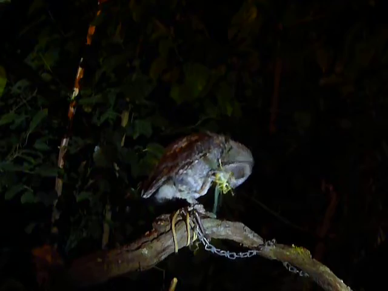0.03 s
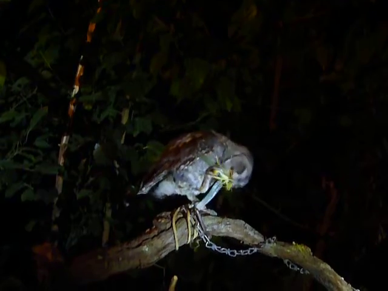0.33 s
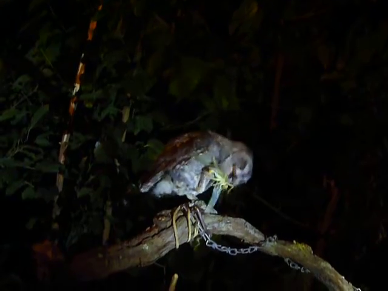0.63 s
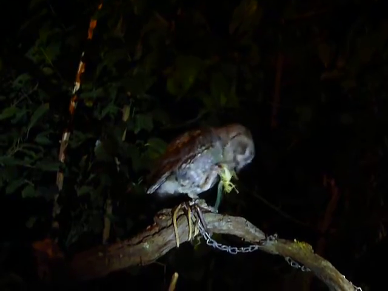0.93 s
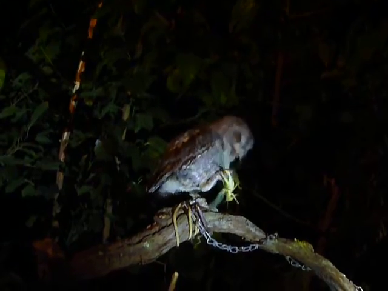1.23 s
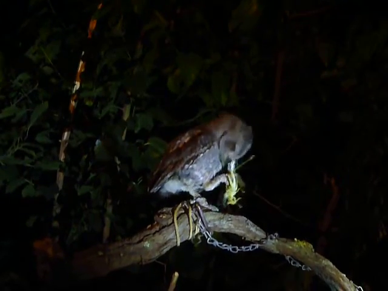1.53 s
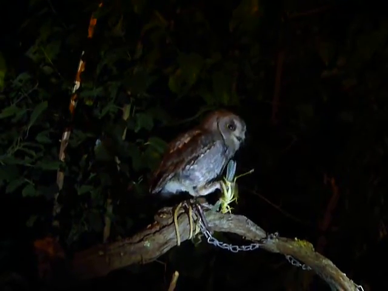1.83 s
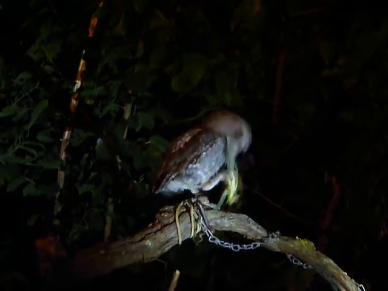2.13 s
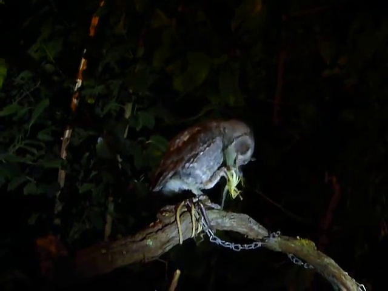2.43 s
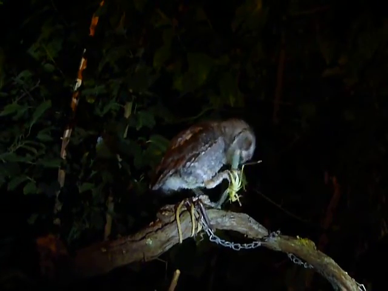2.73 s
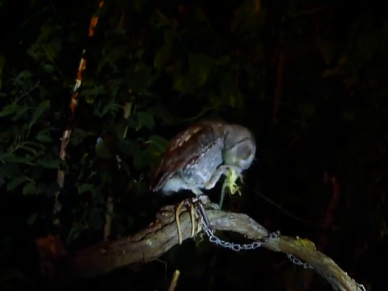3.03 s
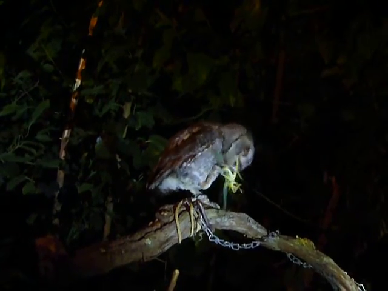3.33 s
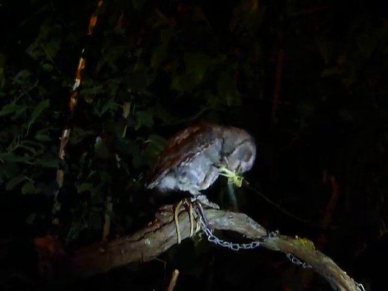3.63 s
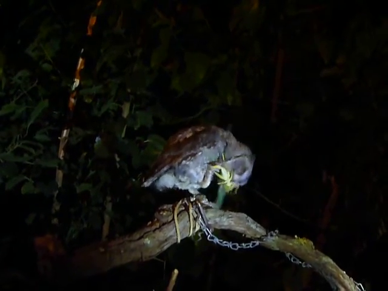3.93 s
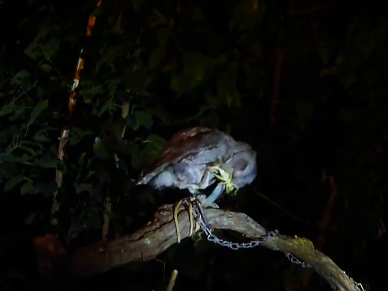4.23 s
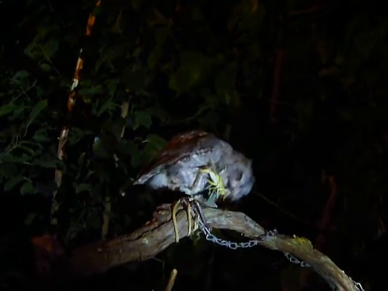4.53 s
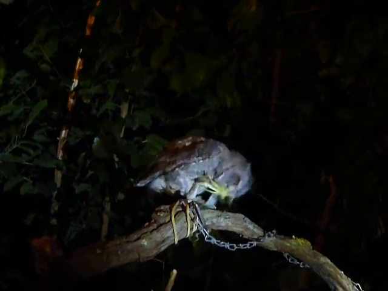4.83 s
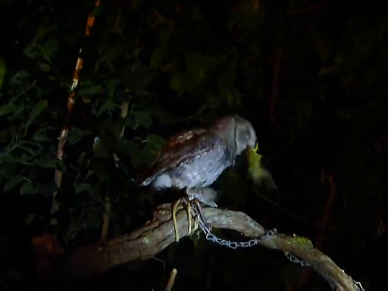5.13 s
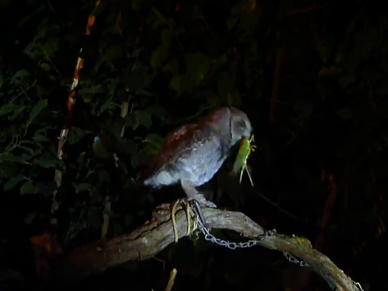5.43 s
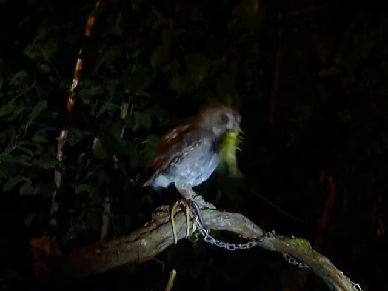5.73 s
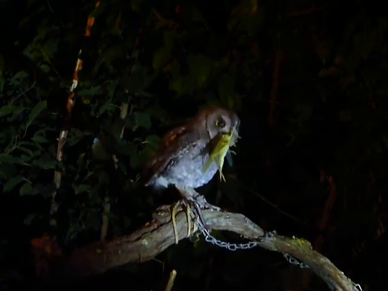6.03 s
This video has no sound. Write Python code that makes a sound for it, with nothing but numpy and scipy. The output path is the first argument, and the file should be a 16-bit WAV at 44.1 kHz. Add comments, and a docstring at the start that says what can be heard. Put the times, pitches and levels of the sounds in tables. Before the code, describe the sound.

At night by the edge of a wood, crickets make a faint, continuous chorus: one trills, another chirps about three times a second. A katydid gives a dry double scrape every second or two, and tiny high ticks come from the leaves. From about a second in, soft low bumps reach the microphone, singly and in flurries, standing above the insects. A distant rumble and light hiss run underneath.

```python
"""A cricket trills at night at the edge of a wood, rubbing its wings, while other crickets chirp.
A katydid (a bush cricket) scrapes its wings every second or two, and thin ticks come from the leaves.
Soft low bumps reach the microphone, singly and in flurries. One dry snip may be a tethered owl feeding
on a branch. Leaves smear the insects' calls; behind them lie a far hollow note, a rumble and a hiss."""
import sys
import numpy as np
from scipy import signal
from scipy.fft import rfft, irfft
from scipy.io import wavfile
from scipy.ndimage import uniform_filter1d

SR = 44100
rng = np.random.default_rng(int(sys.argv[2]) if len(sys.argv) > 2 else 0)


def file_out(sig):
    """Save sig as 16-bit WAV at sys.argv[1]."""
    # one column per channel
    cols = np.atleast_2d(sig).T
    # limit, then scale
    lim = np.clip(cols, -1, 1)
    pcm = np.round(lim * 32767).astype(np.int16)
    wavfile.write(sys.argv[1], SR, pcm)


N = 273420
T = np.arange(N) / SR


def trilling_cricket(hz=3590, drift_hz=8, others_db=-9, gain_db=-1.6):
    """A cricket rubs its wings in a fast, unbroken trill, with more of its kind blended behind it."""
    # how loud the trill is over time: t/s, level/dB
    loudness = [(0.0, -60), (0.08, -61), (3.54, -58.5), (3.59, -57), (4.97, -57), (5.27, -64), (6.2, -64.5)]
    times, db = np.transpose(loudness)
    song = wing_strokes(49.2, hz + drift_hz * drift(2), duty=.77, fall_hz=159.9, wander=.005)
    blend = unit(foliage(song, fade_s=.23, echo_db=-3.5)) + undb(others_db) * noise_band(3632, 120)
    return unit(blend) * undb(np.interp(T, times, db) + gain_db)


def wing_strokes(per_second, hz, duty, fall_hz, wander):
    """Each stroke is a short tone that sinks as the wing slows; it sounds for the share `duty` of a beat."""
    cycle = (np.cumsum(per_second * (1 + wander * drift(5))) / SR + rng.random()) % 1
    progress = np.minimum(cycle / duty, 1)
    pitch = hz - fall_hz * (progress - .5) + 18 * drift(40)
    strength = np.sin(np.pi * progress) * undb(1.1 * drift(35))
    return unit(strength * tone(pitch))


def near_cricket(stroke_s=.027, gap_s=.0322, hz=4800, fall_hz=560, first_db=-5, count=4):
    """Four wing strokes make a chirp, the first one soft; each holds its pitch and then droops."""
    # chirps, timed at their last stroke: t/s, level/dB
    chirps = [(.148, -62), (.385, -62), (.692, -57), (.982, -63), (1.266, -58.5), (1.547, -57),
              (1.925, -54), (2.342, -52), (2.683, -54.5), (3.066, -56), (3.408, -56.5), (3.719, -61),
              (4.002, -59.5), (4.566, -58), (4.855, -55.5), (5.242, -58), (5.522, -56), (5.79, -56.5),
              (6.139, -60)]
    out = np.zeros(N)
    progress = np.linspace(0, 1, int(stroke_s * SR))
    for s, db in chirps:
        for k, (size, detune) in enumerate(rng.standard_normal((count, 2))):
            pitch = hz + 15 * detune - fall_hz * progress ** 3
            stroke = np.sin(np.pi * progress) ** 2 * tone(pitch)
            i = int((s - k * gap_s - stroke_s / 2) * SR)  # k counts back from the last stroke
            out[i:i + len(stroke)] += stroke * undb(db + size + first_db * (k == count - 1))
    return foliage(out, fade_s=.2, echo_db=-12)


def katydid(tooth_hz=330, grain=.42, attack_s=.005, release_s=.018, sag=.35, ring_s=.014):
    """Two dry scrapes a call: tiny wing teeth chop a hiss, and the wing rings late in each stroke."""
    # calls: t/s, level/dB, gap between the two scrapes/s
    calls = [(.685, -51, 0.08), (2.046, -53.5, .086), (3.744, -53, 0.0604), (5.315, -53, 0.088)]
    # the two scrapes of a call: length/s, level/dB, wing ring f/Hz, ring level/dB
    scrapes = [(0.06, -0.5, 2360, -12), (0.043, -3, 1290, -2)]
    # tone colour of a scrape: f/Hz, level/dB
    scrape_colour = [(600, -14.5), (1050, 5.5), (1800, 3), (2400, -1), (3200, -9.5), (4400, -5),
                     (6200, -10), (7800, -24), (9000, -37.5)]
    hiss = coloured_noise(scrape_colour)
    out = np.zeros(N)
    for k, (length, scrape_db, hz, ring_db) in enumerate(scrapes):
        wing = undb(ring_db) * noise_band(hz, width_hz=130)
        for s, db, gap in calls:
            t = T - s - k * gap
            force = np.interp(t, [0, attack_s, length, length + release_s], [0, 1, sag, 0])
            ring = np.exp(-((t - .7 * length) / ring_s) ** 2)
            out += undb(db + scrape_db) * (force * hiss + ring * wing)
    teeth = 1 + grain * tone(tooth_hz * (1 + .15 * drift(60)))
    return foliage(out * teeth, fade_s=.28, echo_db=-4)


def bumps(lag_s=.0039, cycles=.69, rise_s=.013, decay_s=.018, swing_db=-2, shudder_db=-10.5):
    """Each bump is one dull swing of air pressure, wrapped in a brief, uneven shudder."""
    # the stronger bumps: t/s, level/dB, f/Hz
    strong_bumps = [(1.263, -24, 137), (1.289, -29.5, 76), (1.418, -25.5, 124), (1.436, -25, 99),
                    (1.701, -31.5, 84.5), (2.015, -33.5, 115), (2.193, -24, 164), (2.332, -21, 174),
                    (2.385, -26, 128), (2.897, -28.5, 105), (3.051, -23, 170), (3.206, -23.5, 80.6),
                    (3.429, -19.5, 112.4), (3.45, -25.5, 75.4), (3.712, -16.5, 188), (3.734, -23, 90),
                    (3.76, -22.5, 104.5), (3.802, -22.5, 99), (4.094, -25.5, 104.3), (4.223, -25, 176),
                    (4.266, -25.5, 80.4), (4.281, -20.5, 150), (5.107, -18.5, 179), (5.144, -20.5, 157),
                    (5.377, -17, 183), (5.437, -25.5, 129)]
    swings, shake = np.zeros(N), np.zeros(N)
    for s, db, hz in strong_bumps + flurries():
        i = int((s + lag_s) * SR)
        near = slice(max(i - SR // 10, 0), min(i + SR // 6, N))
        t = T[near] - s - lag_s
        swings[near] -= undb(db + swing_db) * np.exp(-(t * hz / cycles) ** 2) * np.cos(2 * np.pi * hz * t)
        shake[near] += undb(db) * np.exp(np.minimum(t / rise_s, -t / decay_s))
    shudder = coloured_noise([(20, -3.5), (55, 2.5), (130, 2), (220, -2.5), (320, -14.5),
                              (500, -25.5), (1200, -63), (4000, -100)])
    thuds = swings + undb(shudder_db) * shake * shudder
    return colour(thuds, [(15, -12), (35, -2), (70, 0)])  # soften the deepest bass


def flurries(gap_s=.036, hz=92, unevenness=.15, spread_db=2, octaves=.28):
    """List lighter bumps, uneven in time, strength and pitch, as rows of t/s, level/dB, f/Hz."""
    # runs of lighter bumps: start/s, end/s, level/dB
    runs = [(1.01, 1.18, -33), (2.26, 2.31, -32), (2.6, 2.79, -29), (3.08, 3.18, -26.5), (3.97, 4.07, -35),
            (4.63, 4.79, -37), (4.92, 5.04, -35.5), (5.19, 5.36, -29), (5.5, 5.6, -35.5)]
    rows = []
    for start, end, db in runs:
        for s, (late, size, detune) in zip(np.arange(start, end, gap_s), rng.standard_normal((20, 3))):
            rows.append((s + unevenness * gap_s * late, db + spread_db * size, hz * 2 ** (octaves * detune)))
    return rows


def ticks(rise_s=.0006, scatter_s=.003, scatter_db=-9, faint_gap_s=.19, gain_db=1):
    """Tiny high ticks, clear or faint: each rings for an instant and scatters off nearby leaves."""
    # the clearest ticks: t/s, level/dB, f/Hz
    clear = [(0.1196, -59, 7560), (0.2937, -60, 7880), (0.4563, -61, 7560), (0.6259, -64, 7350),
             (0.9946, -63, 7760), (1.1777, -64.5, 7450), (2.2797, -64, 7390), (3.1372, -59, 7900),
             (3.3547, -59, 7900), (3.87, -57, 7820), (4.2347, -61, 7120), (4.5638, -63, 7320),
             (5.4899, -62, 7350), (6.0775, -61, 7660)]
    beats = np.arange(faint_gap_s, T[-1] - faint_gap_s, faint_gap_s)
    faint = [(s + late * faint_gap_s / 2, -65 + 5 * size, 7600 + 230 * detune)
             for s, (late, size, detune) in zip(beats, rng.uniform(-1.2, 1, size=(100, 3)))]
    ring, scatter = np.zeros(N), np.zeros(N)
    t = T[:SR // 40]
    pulse = t / rise_s * np.exp(1 - t / rise_s)
    for s, db, hz in clear + faint:
        i = int(s * SR)
        ring[i:i + len(t)] += undb(db) * pulse * np.sin(2 * np.pi * hz * t)
        scatter[i:i + len(t)] += undb(db) * np.exp(-t / scatter_s)
    return undb(gain_db) * (ring + undb(scatter_db) * scatter * noise_band(7800, 550))


def snip(at_s=4.744, width_s=.007, db=-57):
    """One brief dry snip, perhaps the owl's beak at its prey."""
    return undb(db) * np.exp(-((T - at_s) / width_s) ** 2) * noise_band(2750, width_hz=700)


def far_crickets(beat_s=.3005, swell_s=.09, between_db=-72):
    """Two far crickets, each with its own wing speed and pitch, swell together on a steady beat."""
    # spells of chirping: first swell/s, end/s, level/dB
    spells = [(0.0, 4.35, -63.5), (4.5, 5.15, -69.5), (5.48, 5.6, -62.5), (5.91, 6.0, -63.5)]
    swell = np.full(N, undb(between_db))
    for start, end, db in spells:
        for s in np.arange(start, end, beat_s):
            swell = np.hypot(swell, undb(db) * np.exp(-((T - s) / swell_s) ** 2 / 2))
    songs = sum(wing_strokes(per_second, hz, duty=.9, fall_hz=260.4, wander=.052)
                for per_second, hz in [(29, 4990), (32, 5130)])
    return unit(foliage(songs, fade_s=.36, echo_db=-4)) * swell


def far_note(at_s=.853, width_s=.031, hz=720, db=-47):
    """One faint, hollow note from far away."""
    return undb(db) * np.exp(-((T - at_s) / width_s) ** 2) * np.sin(2 * np.pi * hz * T)


def night():
    """A distant rumble, a smooth hiss and the merged song of far insects."""
    # tone colour of the rumble: f/Hz, level/dB
    rumble_colour = [(20, -6.5), (50, 0.5), (110, -3.5), (170, -1), (300, -4.5), (400, -7.5), (560, -5),
                     (720, -9), (950, -10.5), (1250, -19.5), (1500, -37), (2000, -51), (6000, -91)]
    # tone colour of the hiss: f/Hz, level/dB
    hiss_colour = [(900, -11.5), (1800, 3), (2500, 3.5), (3300, 2), (4100, 0), (5700, -2), (6500, -3.5),
                   (7800, -9), (8300, -18), (8800, -32)]
    # bands of insect song: f/Hz, width/Hz, level/dB
    insect_bands = [(3147, 57, -77), (3545, 214, -64), (4824, 200, -68)]
    rumble = coloured_noise(rumble_colour) * undb(-46 + .5 * drift(2.9))
    hiss = coloured_noise(hiss_colour) * undb(-62.5 + .23 * drift(4.7))
    chorus = sum(noise_band(hz, width) * undb(db + drift(3)) for hz, width, db in insect_bands)
    return rumble + hiss + chorus


def foliage(x, fade_s, echo_db):
    """Leaves and trunks add a short, blurred echo that drops by 60 dB in fade_s."""
    t = T[:SR // 2]
    tail = rng.standard_normal(len(t)) * np.exp(-np.log(1000) * t / fade_s)
    return x + undb(echo_db) * signal.fftconvolve(x, tail / np.linalg.norm(tail))[:N]


def undb(db):
    """Turn decibels into a number to multiply by."""
    return 10 ** (np.asarray(db) / 20)


def unit(x):
    """Scale to an average strength (rms) of 1."""
    return x / np.sqrt(np.mean(x ** 2) + 1e-18)


def tone(pitch):
    """A pure tone that follows a changing pitch in Hz."""
    return np.sin(2 * np.pi * np.cumsum(pitch) / SR)


def drift(per_second):
    """A smooth random wobble of about 1 either way."""
    k = int(SR / per_second)
    steps = np.repeat(rng.standard_normal(N // k + 2), k)
    return unit(uniform_filter1d(uniform_filter1d(steps, k), k)[:N])


def colour(x, points):
    """Turn lows and highs up or down along points of f/Hz, level/dB."""
    hz, db = np.transpose(points)
    f = np.maximum(np.fft.rfftfreq(N, 1 / SR), 1)
    return irfft(rfft(x) * undb(np.interp(np.log(f), np.log(hz), db)), N)


def coloured_noise(points):
    """Noise with the given tone colour, at strength 1."""
    return unit(colour(rng.standard_normal(N), points))


def noise_band(hz, width_hz):
    """Noise gathered around one pitch, at strength 1."""
    f = np.fft.rfftfreq(N, 1 / SR)
    bell = np.exp(-((f - hz) / width_hz) ** 2)
    return unit(irfft(rfft(rng.standard_normal(N)) * bell, N))


def scene():
    """All the sounds add up at one microphone."""
    insects = trilling_cricket() + far_crickets() + near_cricket() + katydid()
    return (insects + snip() + ticks() + far_note() + bumps() + night())[None]


def record(dry, top_hz=8600, offset=.0145):
    """The recorder whines faintly and adds a steady offset; a few narrow bands fall silent and the top is cut."""
    # tones of the electrical whine: f/Hz, level/dB
    whine = [(7857, -96), (7887, -93.5), (8113, -95.5), (8143, -96.5)]
    # narrow bands cut from the sound: f/Hz, width/Hz
    notches = [(1405, 154), (1595, 336), (2150, 178), (5435, 190)]
    sound = dry + sum(np.sqrt(2) * undb(db) * np.sin(2 * np.pi * hz * T) for hz, db in whine)
    for hz, width in notches:
        sound = signal.lfilter(*signal.iirnotch(hz, hz / width, fs=SR), sound)
    treble_cut = signal.ellip(8, .2, 70, top_hz, fs=SR, output="sos")
    return signal.sosfilt(treble_cut, sound) + offset


dry = scene()
out = record(dry)
file_out(out)
```